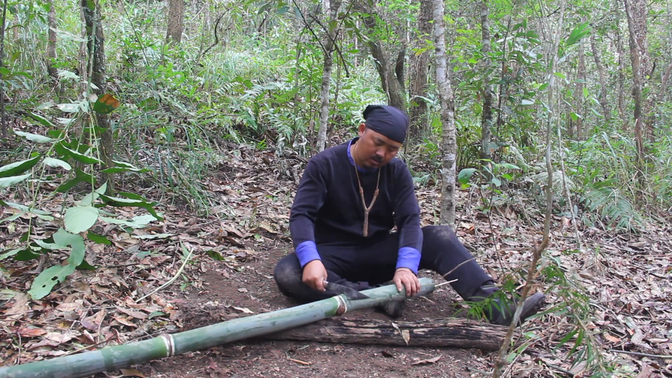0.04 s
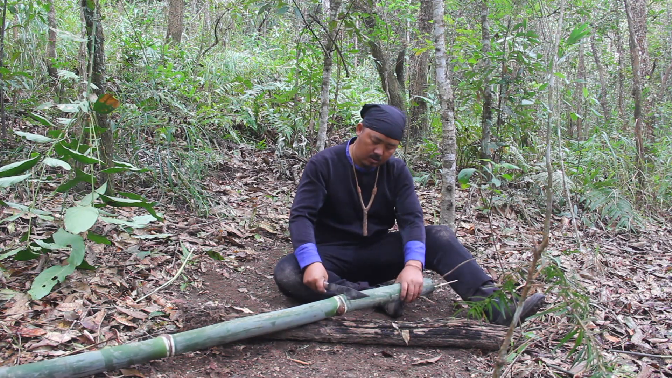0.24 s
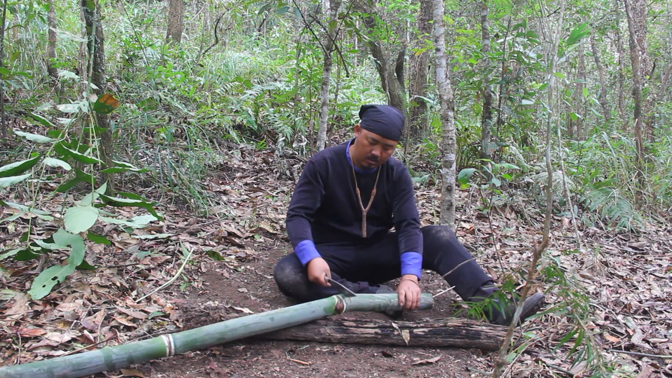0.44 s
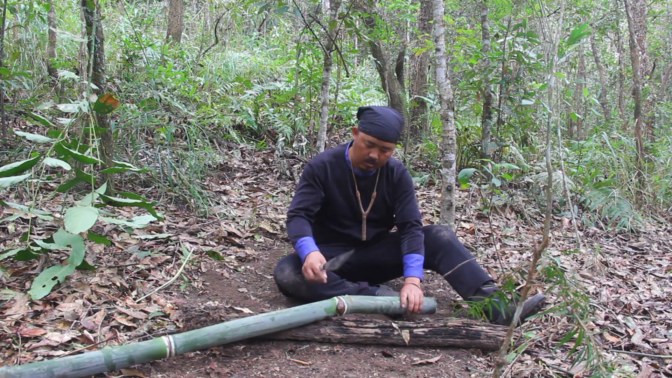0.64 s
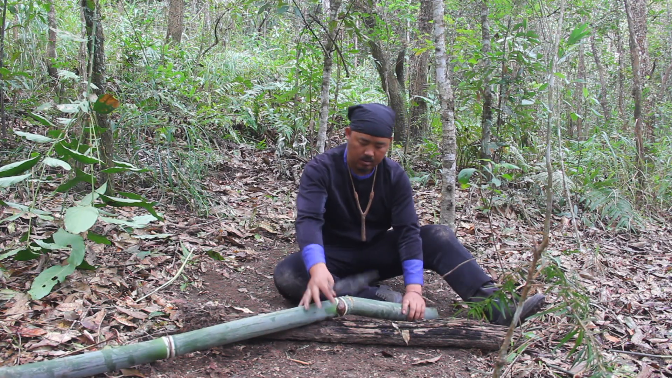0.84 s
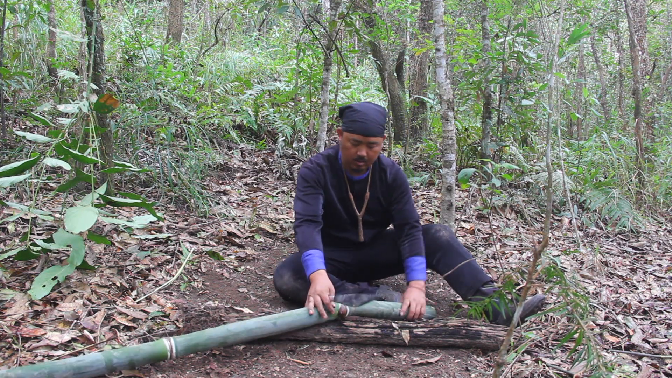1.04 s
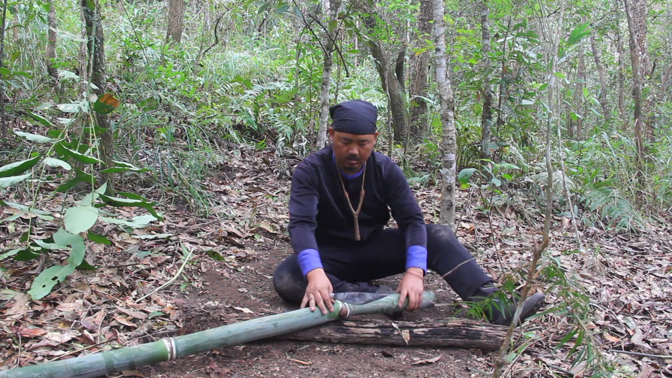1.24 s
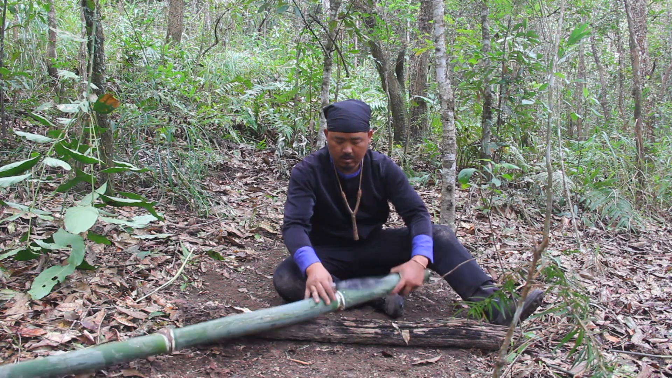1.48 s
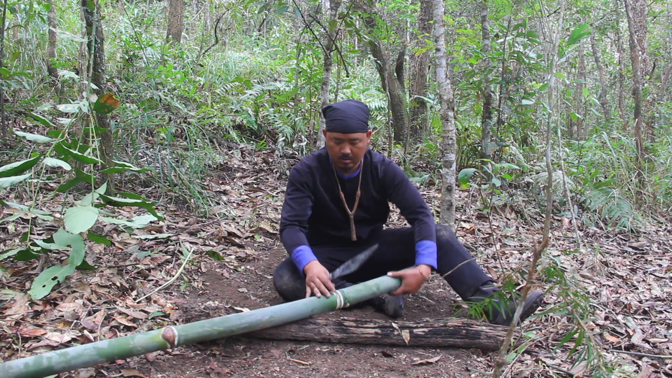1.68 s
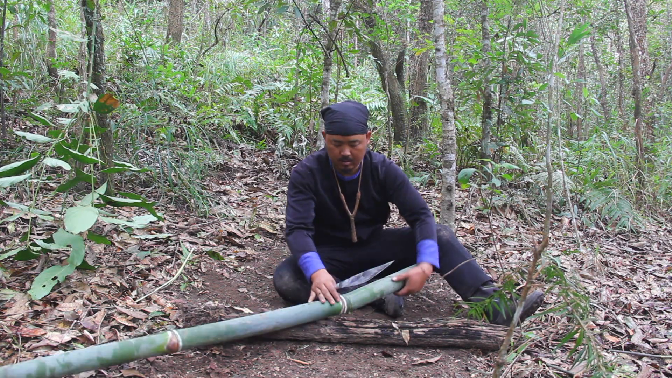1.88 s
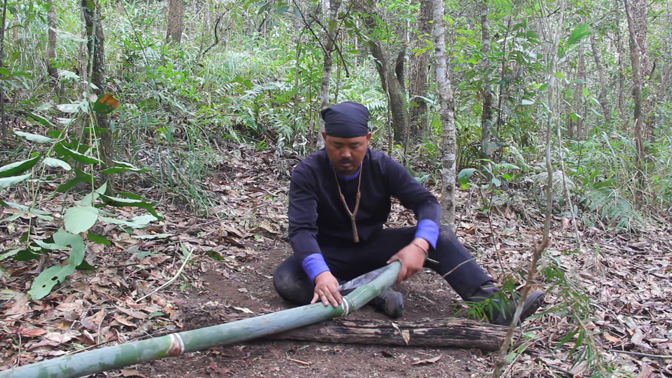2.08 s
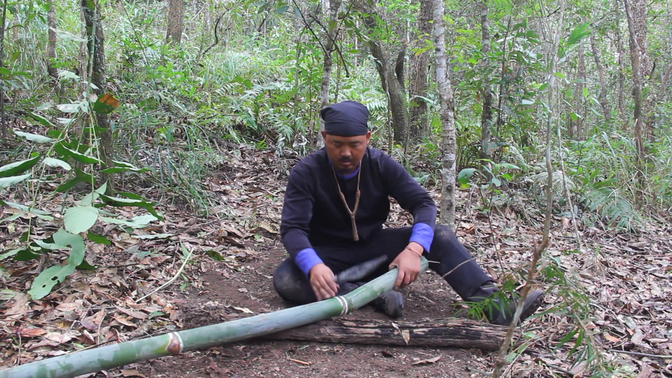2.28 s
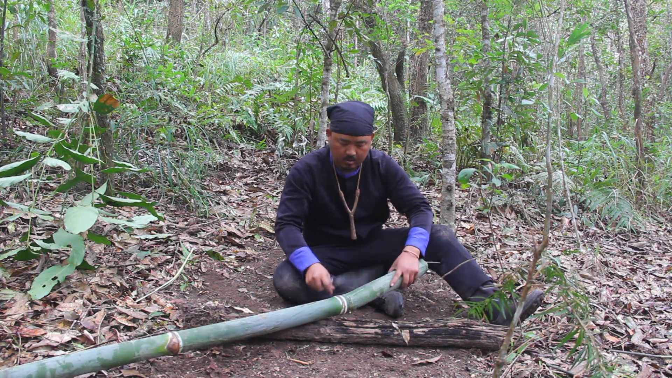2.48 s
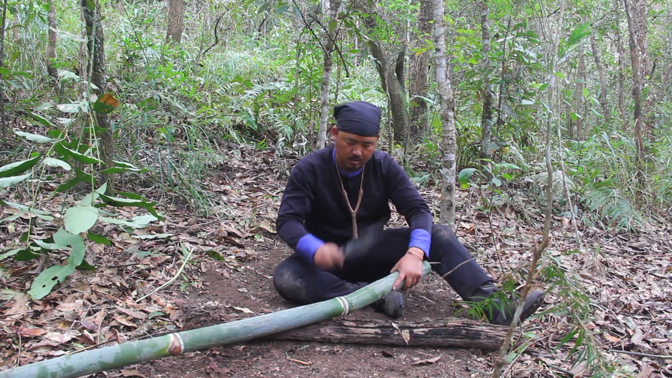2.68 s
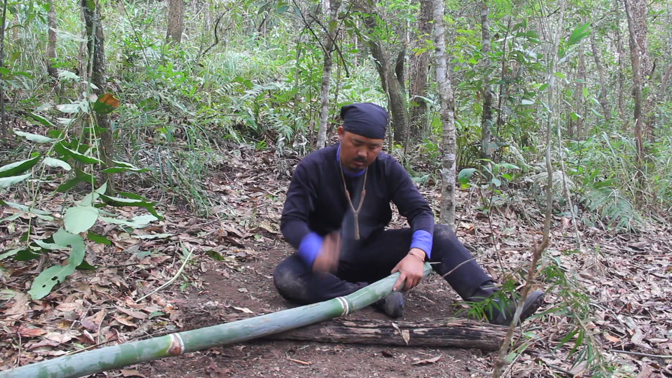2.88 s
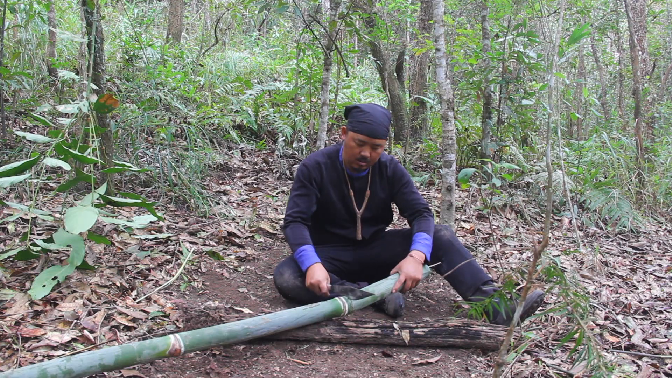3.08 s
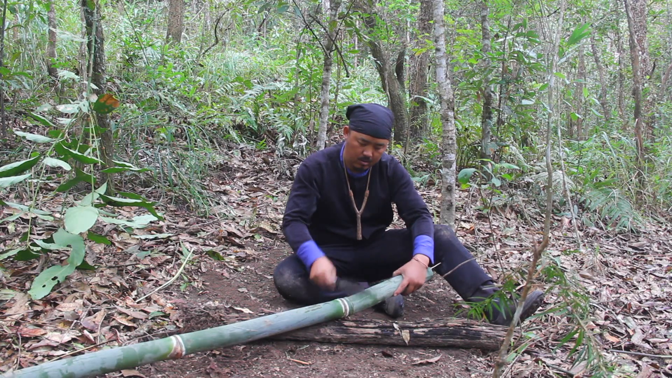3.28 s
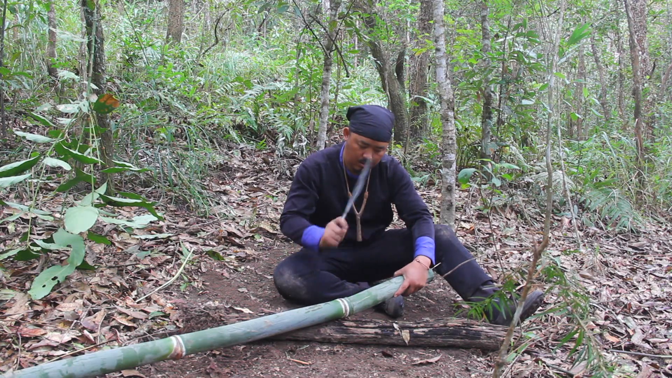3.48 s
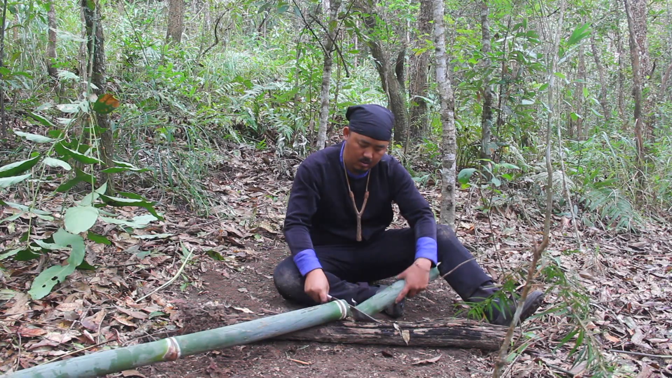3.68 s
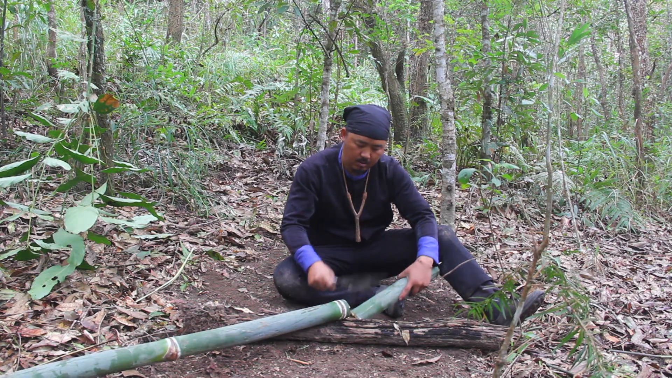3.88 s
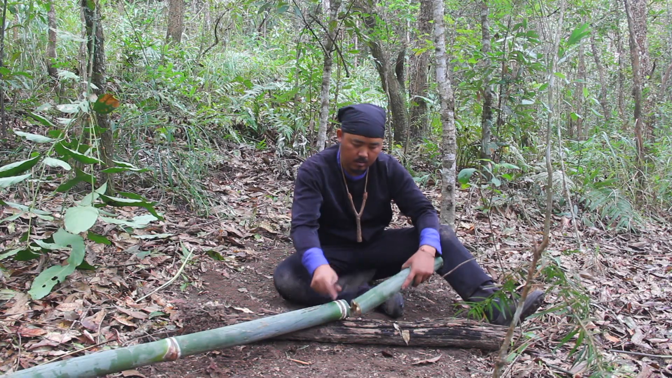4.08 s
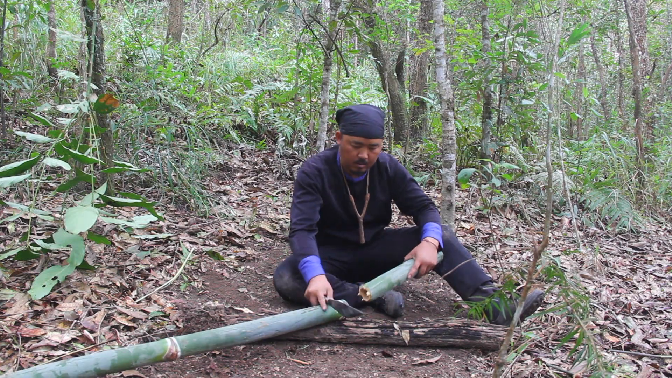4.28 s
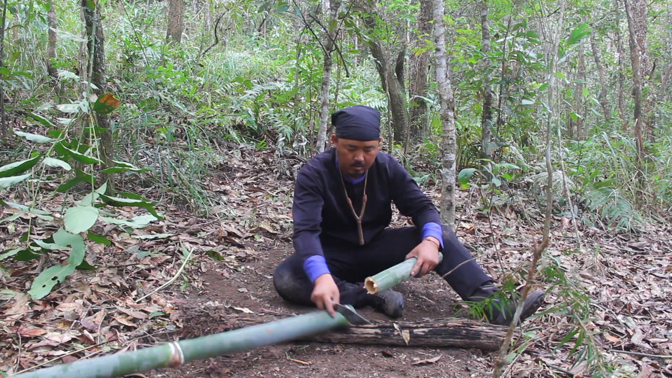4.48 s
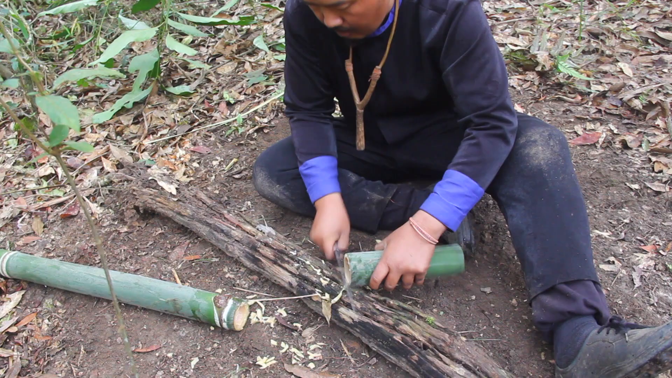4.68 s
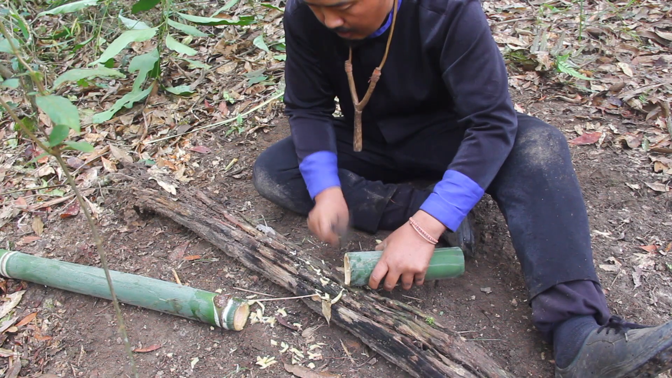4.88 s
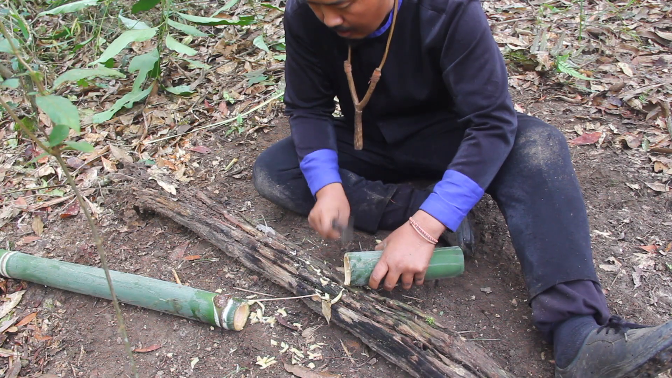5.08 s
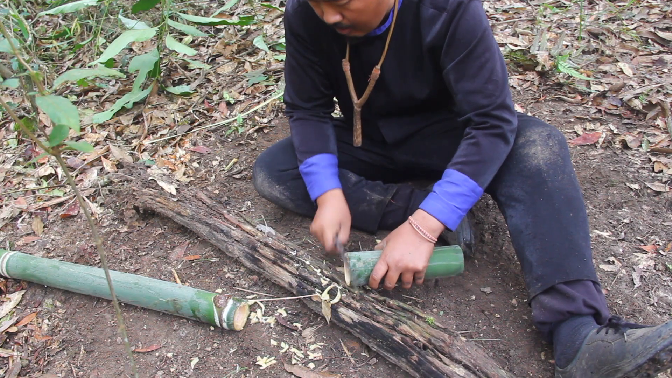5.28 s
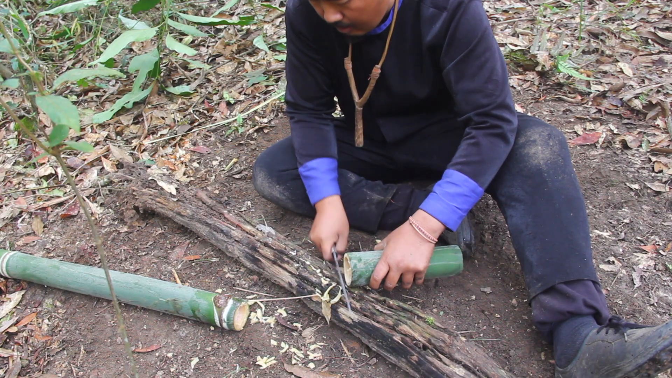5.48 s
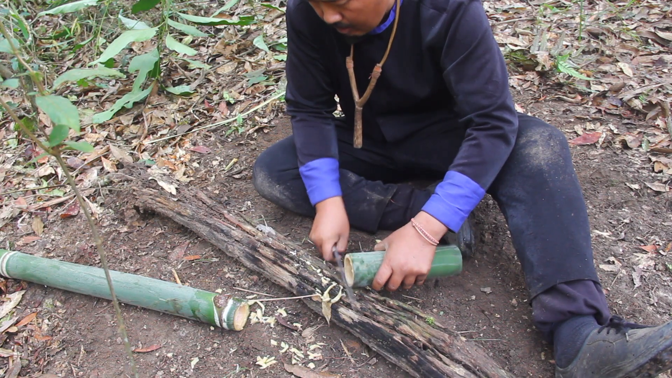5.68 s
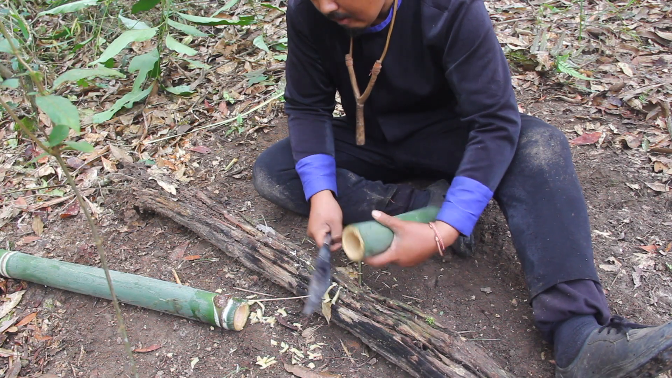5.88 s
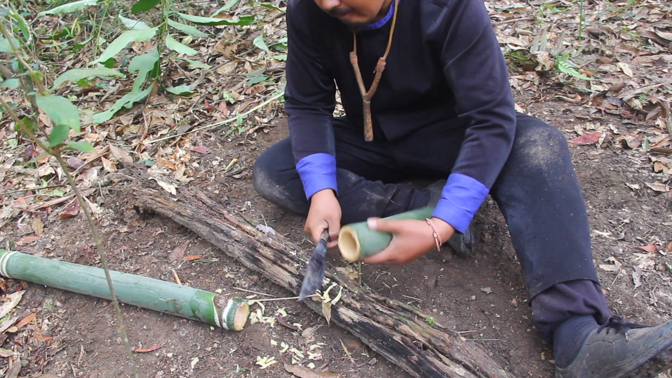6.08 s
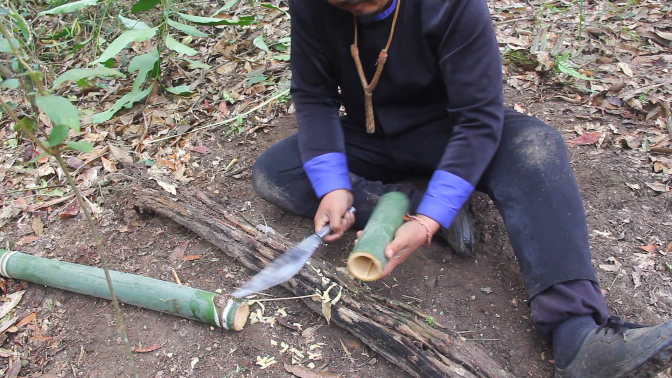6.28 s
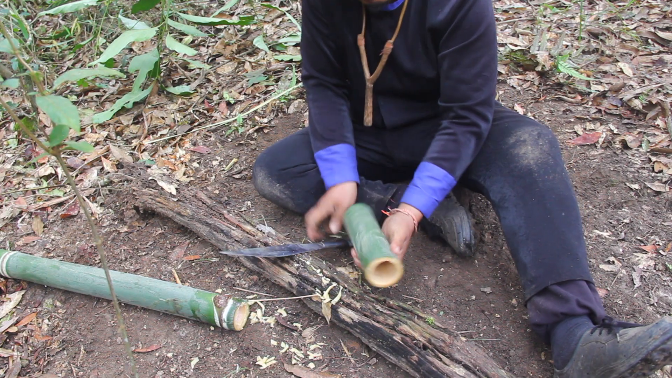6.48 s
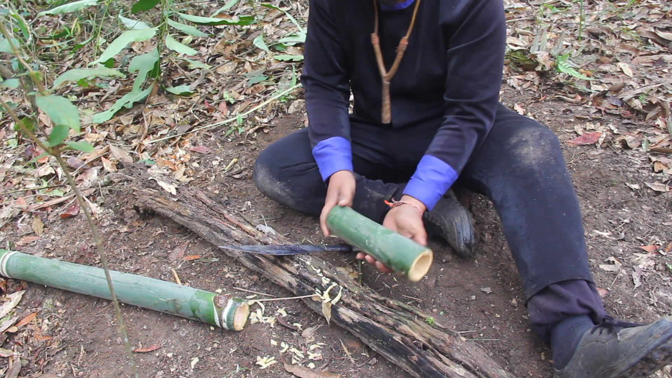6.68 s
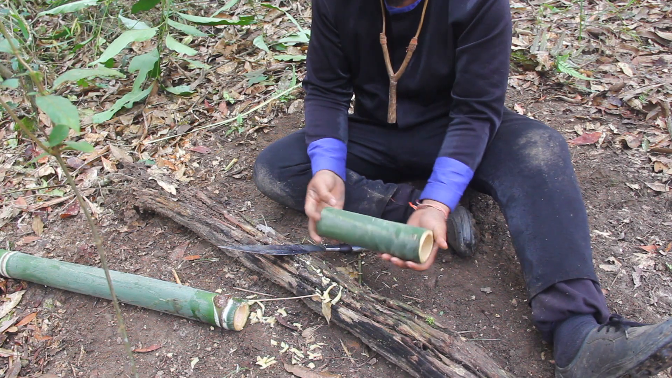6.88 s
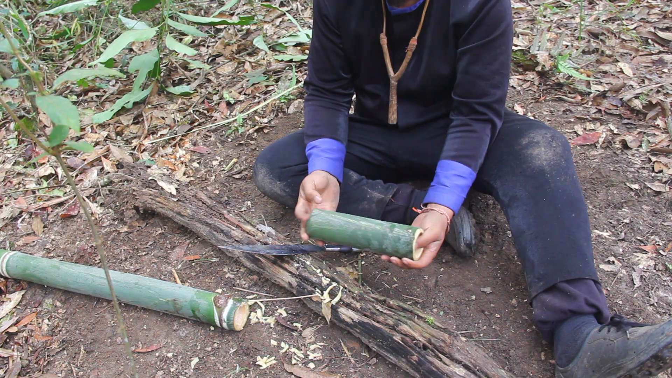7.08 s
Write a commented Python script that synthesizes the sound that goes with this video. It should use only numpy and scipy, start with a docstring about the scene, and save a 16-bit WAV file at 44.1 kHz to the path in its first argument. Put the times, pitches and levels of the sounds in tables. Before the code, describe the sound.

A heavy knife chops through green bamboo in a quiet forest, with hollow knocks, cracking fibres and rustling leaves, then quickly trims the cut piece.

```python
"""A heavy knife chops a length off a green bamboo pole lying on a log in a quiet forest.
Fibres crack as the blade is wrenched out of the split. Two hard chops make the air in the hollow pole
hum, the piece comes off, and quick strokes trim its rim. The trees echo, dry leaves and sleeves
rustle, and the blade sings faintly as it slides onto the ground.
The hardest blows overload the microphone."""
import sys
import numpy as np
from scipy import signal
from scipy.fft import rfft, irfft, next_fast_len
from scipy.io import wavfile

SR = 44100
rng = np.random.default_rng(int(sys.argv[2]) if len(sys.argv) > 2 else 0)


def master_out(mix):
    """Clip the mix to full scale and print it as 16-bit PCM to the path in sys.argv[1]."""
    frames = np.transpose(np.atleast_2d(mix))
    ceiling = np.clip(frames, -1, 1)
    pcm = np.round(ceiling * 32767).astype(np.int16)
    wavfile.write(sys.argv[1], SR, pcm)


N = 314874
LEAD = SR // 10   # extra samples, so a blow can land just before the start
LENGTH = LEAD + N
TIME = (np.arange(LENGTH) - LEAD) / SR   # seconds in the scene
AGE = np.arange(SR + SR // 4) / SR   # seconds since a blow
PIECE_FROM_S = 4.6   # from here on the knife works on the short piece, close by

# The edge cuts through the cane. Each row: start in seconds, strength in dB, tilt towards the treble
# in dB per octave, crushing time in seconds, low note in Hz, high note in Hz, hum of the air inside
# in dB against the strength, then two notes of blade and cane in Hz that colour the echo.
CUTS = [(-0.04, -15, -0.58, 0.003, 730, 1920, -21.5, 1570, 3430),
        (.3738, -21.5, 1.24, 0.0013, 1022, 1760, -29, 1800, 9500),
        (2.9528, -15.5, 0.014, 0.0022, 760, 2120, -16.5, 4400, 4730),
        (3.6052, -15, -.7, 0.0033, 471, 1895, -15.5, 2000, 9760),
        (4.6433, -25, -1.3, 0.00032, 864, 1240, -28.5, 1010, 3500),
        (4.7272, -19, -1.4, 0.0062, 368, 1860, -39, 8000, 11900),
        (4.9755, -19, -.2, 0.01, 602, 1840, 1.5, 4490, 9500),
        (5.2335, -21, 1.2, 0.0019, 758, 1903, -33, 4800, 6340),
        (5.4795, -20, 1.3, 0.0027, 378, 2090, -6, 3100, 5440)]
# The next four have the same columns, without the last two notes.
BITES = [(3.285, -45, 0, 0.0079, 740, 1330, -7), (4.548, -38.5, 0, 0.0064, 906, 1320, -35),
         (4.578, -41, -0.94, 0.011, 444, 1240, -26.5), (4.718, -26.5, 0, 0.0017, 716, 1720, -35),
         (5.2235, -26.5, -3.3, 0.015, 644, 1200, -37), (5.4745, -33, -0.36, 0.015, 463, 1190, -22.5),
         (5.524, -39, 1, 0.0023, 650, 1780, -26), (5.703, -39, -2, 0.018, 655, 1216, -22),
         (5.787, -52.5, -0.34, .0016, 670, 1720, -17)]   # the edge grinds in the cut without going through
LANDINGS = [(5.2384, -26, -0.32, 0.0019, 764, 1290, -4), (5.485, -27, -0.62, 0.00048, 400, 1366, -12),
            (5.7215, -20.5, -1.1, 0.0021, 810, 2370, -5)]   # a trimming stroke drives the piece onto the log
KNOCKS = [(.968, -40.5, -.7, 0.00099, 788, 1350, -7), (2.5432, -26, .4, .002, 502, 1040, -19),
          (4.3064, -33, 1, .00033, 468, 2020, -24)]   # the pole knocks on the log
BUMPS = [(1.738, -48, 0.59, 0.0055, 100, 1770, -16), (3.858, -53, -1.4, 0.0046, 885, 2680, -11),
         (6.342, -47.5, 0, .009, 362, 1230, -30.5), (6.367, -45.5, -0.84, 0.0061, 315, 2280, -20),
         (6.415, -52, -1, .0037, 342, 1110, 2)]   # the cane bumps softly as it is shifted and turned
# The edges, in Hz, of five pitch bands: thud, hollow, knock, crack and snap.
BAND_EDGES = [180, 350, 1000, 2600, 7500, 17000]
# The tone of each kind of blow. Each lists the five bands, the ground thump and the echo,
# all in dB against the blow's strength.
CUT_TONE = (-14, -9.5, 0, -1, -13.5, -22, -12.5)
BITE_TONE = (-22, -5, 0, -4, -22.5, -23.5, -8)
LANDING_TONE = (-5.5, 7.5, 1.5, -6.5, -18.5, -14.5, -13)
KNOCK_TONE = (4, 1.5, 0.5, -6.5, -32.5, -21.5, -13.5)
BUMP_TONE = (0.5, -4, -11, -6.5, -21, -5, -3.5)

# The notes of the bamboo walls, the air inside them and the steel blade.
# Each row: pitch in Hz, level in dB, seconds to fade by 60 dB (called t60).
POLE_WALL = [(168, -19, 0.23), (290, -13, .13), (471.6, -9, 0.12), (522, -10.5, 0.095), (627, -7.5, 0.15),
             (759, -16, 0.15), (906, -7.5, 0.11), (1052, -9.5, 0.016), (1466, -1.5, 0.042),
             (1807, -5.5, 0.048), (1926, 0.5, 0.036), (1973, 2.5, 0.023), (3215, 0.5, 0.021),
             (3550, 9.5, 0.027), (4320, -1, 0.031), (4700, -2.5, 0.028), (5250, 2, 0.015), (5830, 0, 0.012),
             (9190, 3, 0.013), (10100, -2.5, 0.0166)]
PIECE_WALL = [(294, -10, 0.032), (380.4, -4.5, 0.031), (456, -6, 0.034), (648, -6.5, 0.03), (812, -2, 0.02),
              (921, -10.5, 0.0398), (1250, -5.5, 0.034), (1458, -2, 0.017), (1850, 4.5, 0.013),
              (2080, 2, 0.012), (2325, -2, 0.0096), (2850, -3, 0.029), (3240, -2.5, 0.023),
              (4050, -0.5, 0.028), (4610, 4.5, 0.018), (5260, -1.5, 0.0142), (5650, -6, 0.018),
              (6280, 2.5, 0.006), (7560, -1, 0.015), (9220, -18.5, 0.0268)]
POLE_AIR = [(197, 2, .72), (318, -8, .27), (400, -11, .25), (468, -8, .22), (597, -16, .5), (641, -16, .6),
            (1093, -20, .6)]
PIECE_AIR = [(609, 6, .09), (1846, -20, .1)]
BLADE_NOTES = [(1985, -5, .5), (2073, -5, .5), (3332, -6, .5), (3560, -7, .5), (4300, -4, .35),
               (4480, -4, .45), (4640, -4, .45), (5340, -6, .4), (6130, -4, .35), (6540, -5, .4),
               (6770, -5, .35), (7640, -9, .3), (9460, -12, .3), (11900, -13, .25)]
# How long a wash of sound lasts. Each row: pitch in Hz, t60 in seconds.
CANE_T60 = [(80, 0.23), (300, 0.076), (700, .065), (1500, 0.039), (4000, 0.028), (15000, 0.0049)]   # the many small notes of cane and log
TREES_T60 = [(80, 3.6), (260, 0.61), (700, 1.53), (1840, 1.19), (4850, 0.75), (12800, .55)]   # the echo among the trees
# The tone of the echo, still air, dry leaves and cloth. Each row: pitch in Hz, level in dB.
TREES_SPECTRUM = [(70, 0.5), (150, -9), (350, -18), (700, -7.5), (1500, -8), (4000, 0), (8000, 1),
                  (15000, -4.5)]
AIR_SPECTRUM = [(15, -60), (25, -35), (64, -10.5), (179, -4.5), (298, -6.5), (323, -4), (370, -8.5),
                (447, -7), (570, -8.5), (746, -9), (1000, -11), (2310, -15.5), (3460, -16), (15700, -30.5)]
LEAF_SPECTRUM = [(120, -24.5), (200, -7.5), (346, -11), (472, -7), (800, -7), (926, -2), (1070, -4.5),
                 (1600, -2.5), (5440, -4.5), (15700, -19)]
CLOTH_SPECTRUM = [(290, -37.5), (500, -9.5), (805, -8.5), (903, -13), (1730, -1), (2020, -6.5), (2480, -2),
                  (5390, -5.5), (15700, -26.5)]

# The split runs on, one bundle of fibres after another. Each row: start in seconds,
# length in seconds, first level in dB, last level in dB, seconds between bundles.
RIPS = [(.3415, .031, -16, -2, 0.0063), (.416, .026, -21, -22, 0.0097), (0.8414, .034, -15.5, -14.5, .0095),
        (4.629, .008, -13.5, -9, 0.0048)]
# Single bundles snap. Each row: start in seconds, level in dB, fraying time in seconds.
TEARS = [(.4585, -15, .0041), (.481, -11.5, 0.002), (.489, -14.5, 0.0036), (0.51, -20, .0046),
         (.533, -17, 0.0035), (0.577, -22.5, 0.0052), (.705, -25.5, 0.0034), (.7862, -23.5, 0.0062),
         (.814, -13.5, 0.011), (.89, -11.5, 0.0044), (4.4531, -22, 0.0019)]
# The notes of the split cane. Each row: pitch in Hz, width in Hz, level in dB.
SPLIT_NOTES = [(559, 120, -8), (930, 56, -1.5), (1410, 1000, -11.5), (1720, 200, -3), (2460, 230, -6.5),
               (3410, 280, -0.5), (3860, 230, -0.5), (4440, 220, -4), (5030, 220, -4), (5580, 210, -4),
               (6340, 500, -4.5), (6710, 420, -2.5), (8050, 2200, -12.5), (10330, 690, -10),
               (13200, 3600, -19)]
# The loudest snaps of dry leaves and chips. Each row: start in seconds, level in dB.
LEAF_SNAPS = [(1.071, -26.5), (1.104, -25), (1.194, -24.5), (1.414, -23.5), (1.9163, -24.5), (2.112, -28.5),
              (2.404, -31), (2.447, -29), (3.29, -26), (4.427, -33)]
# The pole drags over leaves, or the edge scrapes the rim. Each row: peak time in seconds,
# level in dB, seconds to rise 20 dB, seconds to fall 20 dB (a minus sign there is ignored).
DRAGS = [(1.09, -50.5, 0.4, .25), (1.41, -43.5, .2, 0.27), (1.645, -42, 0.18, 0.12),
         (1.82, -50.5, 0.3, 0.32), (1.985, -38, .12, 0.04), (2.11, -52, 0.6, 0.13), (2.44, -53, 0.4, -0.28),
         (4.52, -46.5, 0.2, -0.3), (4.63, -33, 0.09, 0.0458), (4.75, -33.5, 0.0458, -0.08),
         (6.89, -47.5, 0.05, 0.15)]
# Sleeves and hands slide. The columns are those of a drag.
SLEEVE_MOVES = [(6.21, -51.5, 0.15, 0.33), (6.34, -47.5, 0.38, 0.41), (6.52, -54.5, 0.16, 0.17),
                (6.78, -53, 0.32, .15), (6.91, -50, 0.11, 0.12)]
# The blade slides onto the ground. Each row: the columns of a drag, then its note in Hz.
BLADE_SLIDES = [(6.785, -53, 0.084, .05, 3340), (6.9, -53.5, .05, 0.091, 5400)]


def from_db(db):
    """Turn decibels into a gain."""
    return 10 ** (np.asarray(db) / 20)


def rms_one(x):
    """Scale a sound to an average (rms) level of 1."""
    return x / np.sqrt(np.mean(x ** 2) + 1e-20)


def energy_one(x):
    """Scale a sound to a total energy of 1."""
    return x / np.linalg.norm(x)


def at_hz(points, hz):
    """Look up a pitch in a table, blending between its rows."""
    pitches, values = np.transpose(points)
    return np.interp(np.log(hz), np.log(pitches), values)


def fade(t60):
    """Die away by 60 dB every t60 seconds."""
    return np.exp(-np.log(1000) * AGE / t60)


def band(x, low, high):
    """Keep the pitches between low and high, in Hz."""
    return signal.sosfilt(signal.butter(2, [low, high], "band", fs=SR, output="sos"), x + 1e-18)


def colour(x, spectrum):
    """Give a sound the tone of a spectrum table, at an average level of 1."""
    size = next_fast_len(len(x))
    hz = np.maximum(np.arange(size // 2 + 1) * SR / size, 1)
    shaped = rfft(x, size) * from_db(at_hz(spectrum, hz))
    return rms_one(irfft(shaped, size)[:len(x)])


def resonance(x, hz, width):
    """Let a sound ring at one pitch; a narrower width rings longer."""
    r = np.exp(-np.pi * width / SR)
    feedback = [1, -2 * r * np.cos(2 * np.pi * hz / SR), r * r]
    return (1 - r * r) / 2 * signal.lfilter([1, 0, -1], feedback, x + 1e-18)


def add(track, start_s, sound):
    """Mix a sound into a track at a given time."""
    start = max(LEAD + round(start_s * SR), 0)
    track[start:start + len(sound)] += sound[:LENGTH - start]


def ring(notes, spread_db):
    """A struck thing rings with fading notes; random levels stand for where the blow lands."""
    return sum(from_db(db + spread_db * rng.normal()) * (-1) ** k
               * np.sin(2 * np.pi * hz * AGE) * fade(t60) for k, (hz, db, t60) in enumerate(notes))


def dying_noise(t60s, hold_s=0):
    """Countless notes blur into noise that holds, then fades at its own speed in each band."""
    edges = np.geomspace(50, 18000, 10)
    fading_s = np.maximum(AGE - hold_s, 0)
    return sum(band(rng.standard_normal(len(AGE)), low, high)
               * np.exp(-np.log(1000) * fading_s / at_hz(t60s, np.sqrt(low * high)))
               for low, high in zip(edges, edges[1:]))


def fracture(hold_s, release_s):
    """Fibres give way in a burst of noise that holds, then dies quickly."""
    t = AGE[:SR // 25]
    envelope = np.exp(-np.maximum(t - hold_s, 0) / release_s)
    return energy_one(rng.standard_normal(len(t)) * envelope)


def struck_cane(wall, crush_s, low_hz, high_hz, grit, wash_db, low_db, high_db, crunch_db):
    """A push and breaking fibres make the wall ring, over the raw crunch of the contact."""
    span = SR // 4
    force = grit * np.sqrt(crush_s / 0.0031) * fracture(crush_s, release_s=0.00095)
    force[0] += 1   # the sharp first push
    sound = energy_one(signal.fftconvolve(ring(wall, spread_db=3.5)[:span], force)[:span])
    sound += from_db(wash_db) * energy_one(dying_noise(CANE_T60, hold_s=crush_s)[:span])
    # the two notes nearest the cut swell for as long as the edge presses
    press = np.exp(-(AGE[:len(force)] / crush_s) ** 2)
    for hz, db, t60 in (low_hz, low_db, 0.055), (high_hz, high_db, 0.022):
        swell = signal.fftconvolve(fade(t60)[:span], press)[:span]
        sound += from_db(db) * energy_one(swell * np.sin(2 * np.pi * hz * AGE[:span]))
    sound[:len(force)] += from_db(crunch_db) * fracture(crush_s, release_s=0.001)
    return sound


def ground_thump(hz, t60):
    """The log is driven against the earth and gives one low, short note."""
    sound = band(np.sin(2 * np.pi * hz * AGE) * fade(t60), 76, 220)
    return sound / np.std(sound[:SR // 40])


def balance(sound, bands_db):
    """Set how loud each band, from thud to snap, is in the first 25 ms of a blow."""
    parts = [band(sound, low, high) for low, high in zip(BAND_EDGES, BAND_EDGES[1:])]
    return sum((-1) ** k * from_db(db) * part / np.std(part[:SR // 40])
               for k, (db, part) in enumerate(zip(bands_db, parts)))


def list_blows(on_piece):
    """List the blows on the pole or on the piece, with levels set by kind, strength and tilt."""
    centres = np.sqrt(np.multiply(BAND_EDGES[:-1], BAND_EDGES[1:]))
    octaves = np.log2(centres / centres[2])   # counted from the knock band
    closer_db = 8 if on_piece else 0   # close by, the trees answer less
    kinds = [(CUTS, CUT_TONE), (BITES, BITE_TONE), (LANDINGS, LANDING_TONE),
             (KNOCKS, KNOCK_TONE), (BUMPS, BUMP_TONE)]
    for rows, (*tone_db, thump_db, echo_db) in kinds:
        for start_s, db, tilt, crush_s, low_hz, high_hz, hum_db, *extra_hz in rows:
            if (start_s > PIECE_FROM_S) == on_piece:
                bands_db = db + np.array(tone_db) + tilt * octaves
                notes = (low_hz, high_hz, *extra_hz)
                yield start_s, crush_s, notes, bands_db, db + thump_db, db + hum_db, echo_db - closer_db


def bamboo_blows(blows, wall, air, thump_hz, thump_t60, **contact):
    """Each blow sounds wall, inner air, ground and blade; gives the direct sound and the trees' share."""
    direct, to_trees = np.zeros((2, LENGTH))
    hum = ring(air, spread_db=4.5)
    thump = ground_thump(thump_hz, thump_t60)
    click = signal.unit_impulse(len(AGE))
    for start_s, crush_s, notes, bands_db, thump_db, hum_db, echo_db in blows:
        steel = from_db(bands_db[-2] - 28) * ring(BLADE_NOTES, spread_db=3)   # follows the crack band
        cane = struck_cane(wall, crush_s, *notes[:2], **contact)
        ground = from_db(thump_db) * thump
        add(direct, start_s, balance(cane, bands_db))
        add(direct, start_s, from_db(hum_db) * hum + ground + steel)
        # heard from all sides, the ringing blurs into a click; only the blow's own notes stand out
        low, high, *extra = [resonance(click, hz, width=0.066 * hz) for hz in notes]
        extra_db = 5 if start_s > PIECE_FROM_S else -1
        blurred = click + low + high + from_db(extra_db) * sum(extra)
        add(to_trees, start_s, from_db(echo_db) * (balance(blurred, bands_db) + ground))
    return np.array([direct, to_trees])


def forest_echo(x, near_db, near_t60, far_db, build_up_s):
    """Ground and nearby trunks answer at once; trees further off give a long, soft wash."""
    far = colour(dying_noise(TREES_T60), TREES_SPECTRUM) * (1 - np.exp(-AGE / build_up_s))
    bounces = rng.standard_normal(len(AGE)) * (rng.random(len(AGE)) < 0.1)
    near = band(bounces, 380, 12000) * fade(near_t60) * (AGE > 0.005)
    response = from_db(far_db) * energy_one(far) + from_db(near_db) * energy_one(near)
    return signal.fftconvolve(x, response)[:LENGTH]


def still_air(level_db):
    """The forest air is a faint, steady hush."""
    return from_db(level_db) * colour(rng.standard_normal(LENGTH), AIR_SPECTRUM)


def running_splits(fray_s, jitter_s):
    """A running split gives way in nearly even steps; gives rows like those of TEARS."""
    return [(start_s + t + jitter_s * rng.normal(), first_db + (last_db - first_db) * t / span_s, fray_s)
            for start_s, span_s, first_db, last_db, step_s in RIPS for t in np.arange(0, span_s, step_s)]


def tearing_fibres(gain_db):
    """Bundles of fibres snap and fray in short bursts that ring in the split cane."""
    bursts = np.zeros(LENGTH)
    for start_s, db, fray_s in TEARS + running_splits(fray_s=0.0061, jitter_s=0.001):
        burst = fracture(0.0008, release_s=fray_s)
        add(bursts, start_s, from_db(db + gain_db) * burst / np.std(burst[:SR // 400]))
    return sum((-1) ** k * from_db(db) * resonance(bursts, hz, width)
               for k, (hz, width, db) in enumerate(SPLIT_NOTES))


def swells(moves):
    """Loudness over time of movements that each speed up to a peak and die away."""
    power = 0
    for peak_s, db, rise_s, fall_s in moves:
        drop_db = 20 * np.maximum((peak_s - TIME) / abs(rise_s), (TIME - peak_s) / abs(fall_s))
        power += from_db(db - drop_db) ** 2
    return np.sqrt(power)


def dry_leaves(grains_per_s, size_db, hiss, snaps_per_s, snap_gain_db):
    """Stirred leaves crackle in countless tiny grains, with a few single snaps."""
    drag = swells(DRAGS)
    sizes = from_db(size_db * np.minimum(rng.exponential(1, LENGTH), 4)) * rng.choice([-1, 1], LENGTH)
    grains = rms_one(sizes * (rng.random(LENGTH) < grains_per_s / SR))
    stirring = np.minimum(drag / from_db(-49), 1) ** 2   # harder drags snap more leaves, up to a limit
    breaks = rng.random(LENGTH) < snaps_per_s / SR * stirring
    break_db = rng.normal(-34.5, 3, LENGTH)
    rustle = drag * colour(grains + hiss * rng.standard_normal(LENGTH), LEAF_SPECTRUM)
    snaps = np.zeros(LENGTH)
    for start_s, db in LEAF_SNAPS + list(zip(TIME[breaks], break_db[breaks])):
        snap = fracture(0.00021, release_s=0.00054)
        add(snaps, start_s, from_db(db + snap_gain_db) * snap / np.abs(snap).max())
    return rustle + band(snaps, 2000, 11000)


def sleeves():
    """Sleeves and hands rub with a soft swish as the piece is turned."""
    return swells(SLEEVE_MOVES) * colour(rng.standard_normal(LENGTH), CLOTH_SPECTRUM)


def sliding_blade():
    """Rubbing keeps one note of the blade singing during each slide."""
    return sum(swells([move]) * rms_one(resonance(rng.standard_normal(LENGTH), hz, width=130))
               for *move, hz in BLADE_SLIDES)


def scene():
    """Mix the work on the bamboo, the small rustles and the forest into one channel."""
    pole = bamboo_blows(list_blows(on_piece=False), POLE_WALL, POLE_AIR, thump_hz=97, thump_t60=0.035,
                        grit=0.75, wash_db=-2.5, low_db=-9.5, high_db=-6.5, crunch_db=2.5)
    piece = bamboo_blows(list_blows(on_piece=True), PIECE_WALL, PIECE_AIR, thump_hz=109.3,
                         thump_t60=0.078, grit=0.97, wash_db=-3, low_db=-13, high_db=-7.5, crunch_db=2)
    direct, to_trees = pole + piece
    fibres = tearing_fibres(gain_db=-1.5)
    leaves = dry_leaves(grains_per_s=2700, size_db=4, hiss=0.65, snaps_per_s=14, snap_gain_db=1)
    cloth = sleeves()
    to_trees += from_db(-10.5) * fibres + from_db(-12.5) * leaves
    echo = forest_echo(to_trees, near_db=-4.5, near_t60=0.21, far_db=-8.5, build_up_s=0.014)
    air = still_air(level_db=-57)
    return (direct + fibres + leaves + cloth + echo + air + sliding_blade())[None, LEAD:]


def record(dry):
    """The hardest blows overload the microphone, and the highest treble is cut off."""
    clipped = np.clip(dry, -1, 1)
    treble_cut = signal.ellip(10, 0.1, 80, 15900, fs=SR, output="sos")
    return signal.sosfilt(treble_cut, clipped)


dry = scene()
out = record(dry)
master_out(out)
```